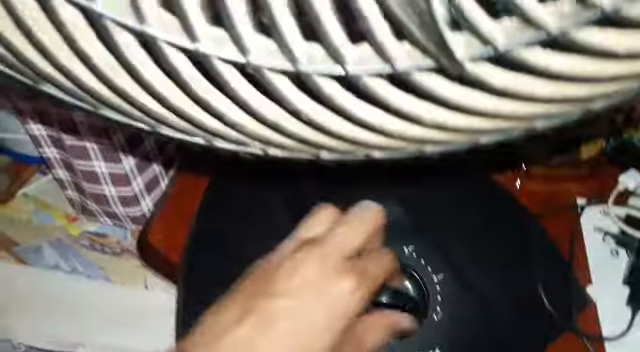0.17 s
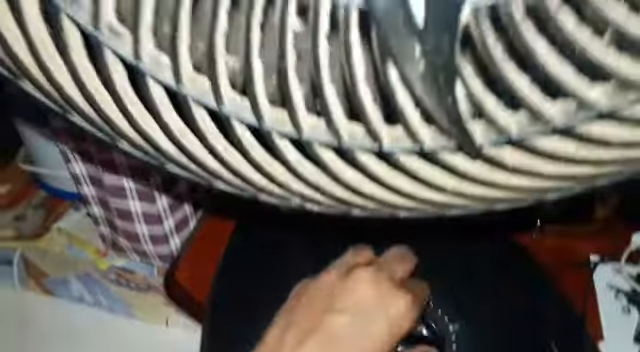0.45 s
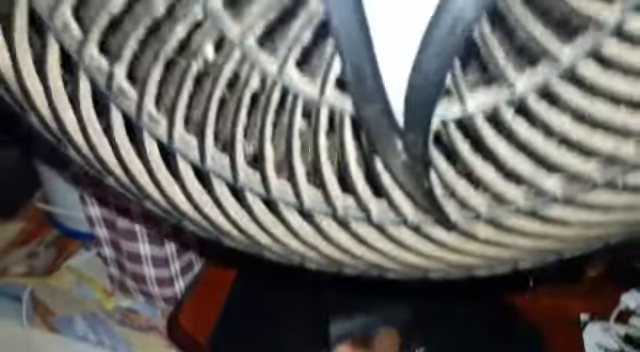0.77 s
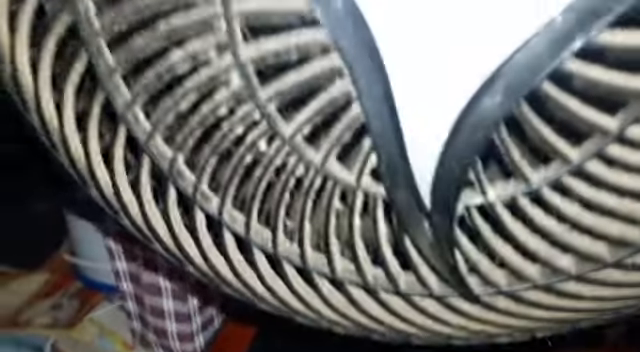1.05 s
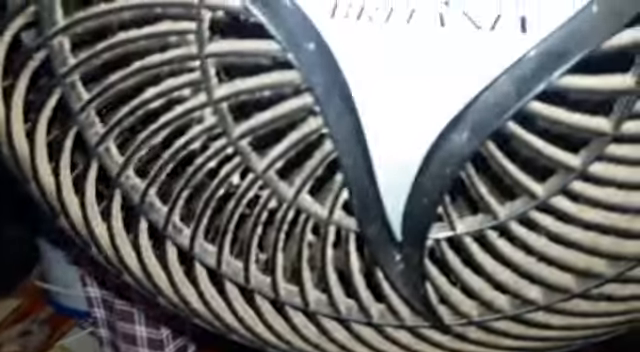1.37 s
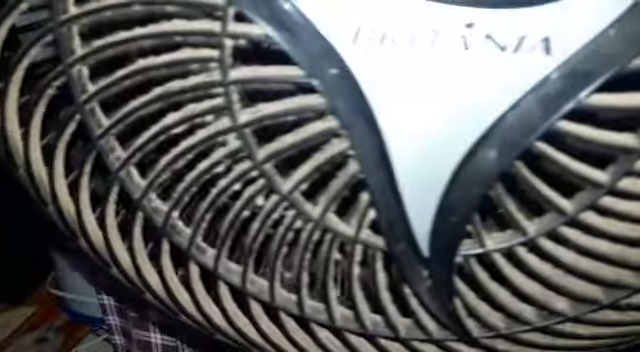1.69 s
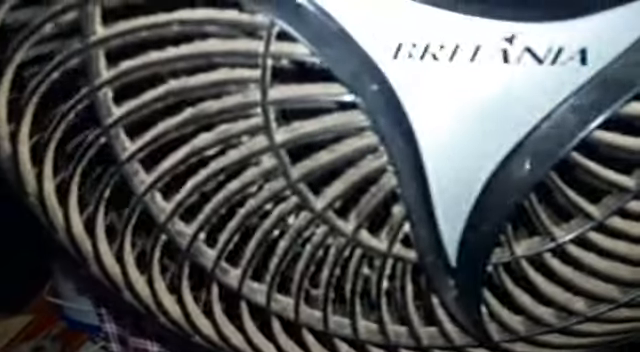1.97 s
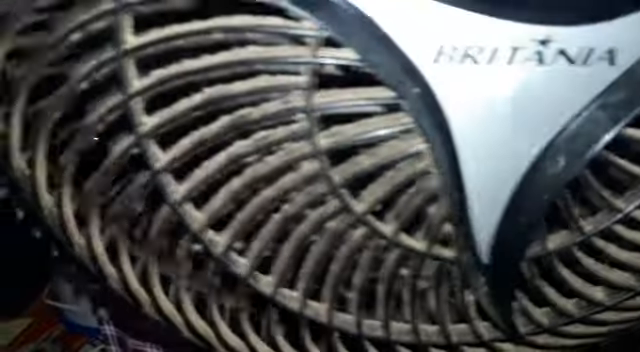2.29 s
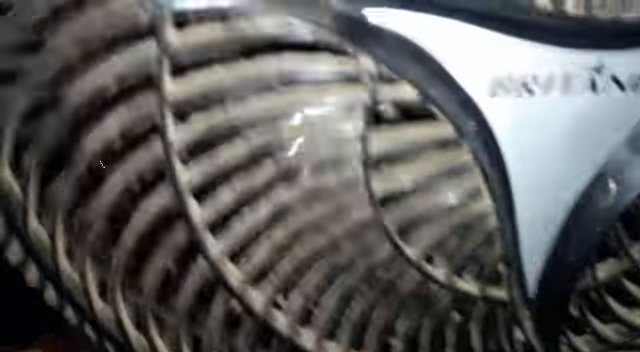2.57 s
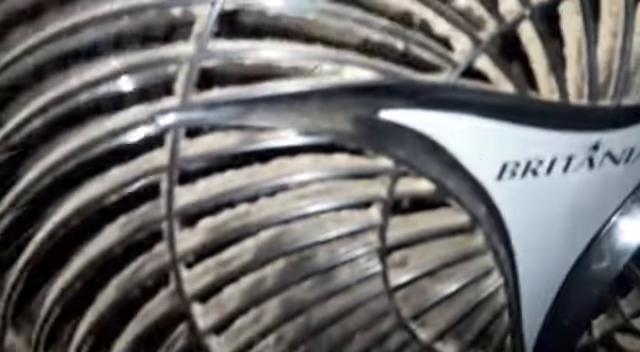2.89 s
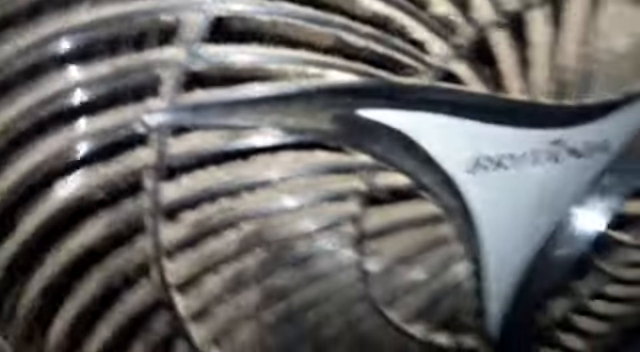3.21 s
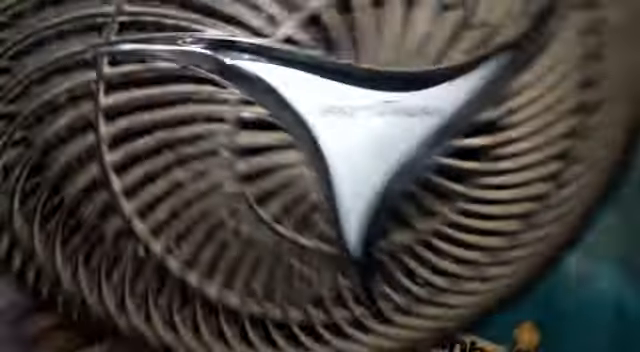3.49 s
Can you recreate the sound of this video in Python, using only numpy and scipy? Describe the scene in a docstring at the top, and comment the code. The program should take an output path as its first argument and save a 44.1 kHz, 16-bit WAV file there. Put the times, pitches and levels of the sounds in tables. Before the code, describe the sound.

A desk fan blows onto a handheld phone indoors, with loud low wind buffeting from start to end, rough, fluttering and slightly overloaded. Irregular dull air slaps punctuate it, strong near 0.6, 1.9, 2.3 and 2.85 seconds. Much quieter blade hiss rises from about 2.3, peaks around 3.1, then recedes. Small, mostly buried plastic ticks occur near 0.3, 0.65, 2.0 and 3.2. Dry, close sound.

```python
"""Desk fan blowing onto a phone

The phone is held in the stream and drifts closer to the guard and away again.
Eddies convected past the port make a low buffeting, higher in pitch in faster air, with strong single slaps.
The blades hiss through the guard as shaped noise; a few small plastic ticks are decaying resonances."""
import sys
import numpy as np
from scipy import signal
from scipy.fft import rfft, irfft, next_fast_len
from scipy.io import wavfile
from scipy.ndimage import uniform_filter1d, map_coordinates

SR = 44100
rng = np.random.default_rng(int(sys.argv[2]) if len(sys.argv) > 2 else 0)


def generate_wav(sig):
    """Save sig (samples, or channels by samples) to the path in sys.argv[1] as 16-bit PCM at SR."""
    pcm = np.round(np.clip(np.atleast_2d(sig).T, -1, 1) * 32767).astype(np.int16)
    wavfile.write(sys.argv[1], SR, pcm)


def volts(x):
    """Linear amplitude factor 10**(x/20) for a level x in dB, scalar or array-like."""
    e = np.asarray(x, float) / 20
    return 10 ** e


N = 160965  # length in samples


def table(rows):
    """Transposition: the columns of a table as arrays."""
    return np.array(rows, float).T


def unit(x):
    """Normalisation of a signal to rms 1."""
    return x / np.sqrt(np.mean(x ** 2))


def shaped(db_of_hz, size):
    """Spectral shaping: white noise weighted in the frequency domain by a level in dB."""
    hz = np.maximum(np.arange(size // 2 + 1) * SR / size, 1)
    return irfft(rfft(rng.standard_normal(size)) * volts(db_of_hz(hz)), size)


def points(rows):
    """Spectral envelope interpolated along a logarithmic frequency axis."""
    corner_hz, corner_db = table(rows)
    return lambda hz: np.interp(np.log(hz), np.log(corner_hz), corner_db)


def walk(rate_hz):
    """Band-limited random fluctuation: a spline through rate_hz normal deviates a second."""
    knots = rng.standard_normal(400)
    return map_coordinates(knots, [np.arange(N) / SR * rate_hz], order=3, mode="mirror")


def resonance_db(hz, centre_hz, width_hz):
    """Resonance curve: 0 dB at the centre, -3 dB at the edges of its width."""
    return -10 * np.log10(1 + (2 * (hz - centre_hz) / width_hz) ** 4)


def hiss(t):
    """Broadband blade noise: octave bands swell together and flicker independently."""
    # blade noise and its treble tilt: start_s, level_db, tilt_db
    blade_noise = [(0, -40, 0.5), (.5, -39.5, 0), (.9, -40, 0.5), (1.2, -37.5, 0.5), (1.55, -36.5, 1.5),
                   (1.8, -38, 1.5), (2.0, -37.5, 2), (2.15, -38.5, 2), (2.3, -36, 2.5), (2.45, -33.5, 1),
                   (2.65, -34, 2), (2.85, -34, 2.3), (3.1, -32.5, 2), (3.25, -34, 1.5), (3.4, -36.5, 1),
                   (3.65, -42, 1)]
    # spectral density of the noise, relative: frequency_hz, density_db
    colour_rows = [(100, -34), (500, -4), (1050, 1.5), (1230, -2.5), (1370, -0.5), (1650, -5.5),
                   (2100, -6.5), (2700, -13.5), (3300, -20.5), (3900, -25.5), (5000, -31), (6300, -28.5),
                   (7400, -21.5), (8000, -30), (8700, -28), (10200, -37.5), (11800, -38.5), (12400, -42.5),
                   (13200, -49.5), (16000, -62.5)]
    # reach of the tilt: octave_above_1_khz, gain_db_per_db_of_tilt
    tilt_reach = [(0, 0), (1, 1.16), (2, 2.5), (3, 3), (4, 4.5)]
    # narrow band, relative to the other noise at its loudest:
    # centre_hz, width_hz, level_db, growth_db_per_db_of_hiss
    narrow_band = (1381, 158, -10, .8)
    swell_db, flicker_db = 0.5, 0.84
    swell_rate_hz, flicker_rate_hz = 12, 21.89

    start_s, level_db, tilt_db = table(blade_noise)
    level = np.interp(t, start_s, level_db)
    tilt = np.interp(t, start_s, tilt_db)
    swell = swell_db * walk(swell_rate_hz)
    colour = points(colour_rows)
    size = next_fast_len(N)
    broad = np.zeros(N)
    for octave in np.arange(-3, 5):
        def band_db(hz):
            """Power-complementary crossfade between neighbouring octaves."""
            distance = np.clip(np.log2(hz / 1000) - octave, -1, 1)
            share = np.cos(np.pi / 2 * distance) + 1e-9
            return colour(hz) + 20 * np.log10(share)

        band = shaped(band_db, size)[:N]
        reach = np.interp(octave, *table(tilt_reach))
        broad += band * volts(reach * tilt + flicker_db * walk(flicker_rate_hz))

    # the narrow band stands out as the hiss grows
    centre_hz, width_hz, ring_db, growth = narrow_band
    ring = shaped(lambda hz: resonance_db(hz, centre_hz, width_hz), size)[:N]
    ring_gain_db = ring_db + growth * (level - level_db.max()) + 2 * walk(7)
    mixed = unit(broad) + unit(ring) * volts(ring_gain_db)
    return unit(mixed) * volts(level + swell)


def resonant_noise(modes):
    """Modal superposition: noise whose power spectrum is a sum of resonances."""
    def modes_db(hz):
        """Incoherent addition of the modal powers."""
        return 10 * np.log10(sum(volts(2 * (db + resonance_db(hz, f, width))) for f, width, db in modes))

    return unit(shaped(modes_db, next_fast_len(N))[:N])


def ticks(t):
    """Damped resonance: each plastic tick is exponentially decaying noise through modes."""
    # ticks, levels of the noise before its envelope, body and top relative to the click:
    # start_s, click_db, t60_s, body_db, body_pitch_hz, top_db
    tick_rows = [(0.3065, -48.5, 0.04, 18.5, 1190, -6), (0.6494, -29.5, 0.019, 7.5, 1470, -17),
                 (2.0162, -38, 0.029, 2.5, 2370, -14.5), (3.1825, -39.5, 0.027, 15.5, 2100, 2.5),
                 (3.194, -42.5, 0.022, 14, 2470, -3), (3.1994, -49, 0.018, 20, 2050, -8)]
    # modes of the click: centre_hz, width_hz, relative_level_db
    click_modes = [(3800, 1400, -9), (6040, 740, -7), (7440, 530, 5.5)]
    # modes of the top: centre_hz, width_hz, relative_level_db
    top_modes = [(9800, 1500, 8), (11800, 1200, -3)]
    body_width_hz, body_t60_ratio = 910, 2.03
    click_rise_s, body_rise_s = 0.001, 0.003

    def decay(age, t60_s, rise_s):
        """Linear rise times an exponential fall of 60 dB in t60_s."""
        return np.minimum(age / rise_s, 1) * np.exp(-np.log(1000) * age / t60_s)

    click = resonant_noise(click_modes)
    top = resonant_noise(top_modes)
    out = np.zeros(N)
    for start_s, click_db, t60_s, body_db, body_hz, top_db in tick_rows:
        age = np.maximum(t - start_s, 0)
        body = resonant_noise([(body_hz, body_width_hz, 0)])
        strike = (click + volts(top_db) * top) * decay(age, t60_s, click_rise_s)
        after_ring = volts(body_db) * body * decay(age, body_t60_ratio * t60_s, body_rise_s)
        out += volts(click_db) * (strike + after_ring)
    return out


def slaps(t):
    """Transient pressure pulses: each strong eddy is a Gaussian-windowed swing of about one cycle."""
    # single strong eddies: start_s, envelope_peak_db, pitch_hz
    strong_eddies = [(0.005, -7, 339), (0.072, -11, 373), (0.276, -12, 350), (0.535, -9.5, 387),
                     (0.619, -3, 333), (0.657, -11.5, 372), (0.867, -10, 405), (0.96, -9, 400),
                     (1.054, -12, 390), (1.126, -12.5, 413), (1.249, -11, 400), (1.506, -14.5, 386),
                     (1.631, -13, 436), (1.703, -15, 385), (1.852, -7.5, 480), (1.892, -4.5, 420),
                     (1.963, -8, 410), (2.011, -6, 370), (2.037, -17, 506), (2.126, -9.5, 440),
                     (2.258, -26, 377), (2.326, -3.5, 392), (2.446, -7, 455), (2.565, -11.5, 450),
                     (2.815, -10, 450), (2.852, -5.5, 380), (2.975, -20, 466), (3.615, -11, 400)]
    spread_cycles, rise_cycles = 0.43, 1.115

    out = np.zeros(N)
    turns = rng.random(len(strong_eddies))
    for (start_s, peak_db, pitch_hz), turn in zip(strong_eddies, turns):
        cycles = (t - start_s) * pitch_hz - rise_cycles
        envelope = np.exp(-0.5 * (cycles / spread_cycles) ** 2)
        # random phase within a quarter cycle either way
        swing = np.cos(2 * np.pi * (cycles + 0.5 * turn - 0.25))
        out += volts(peak_db) * envelope * swing
    return out


def buffeting(t):
    """Frozen turbulence: a fixed row of eddies swept past the port, higher and louder in faster air."""
    # air stream at the port, speed relative to the mean: start_s, level_db, speed_db
    stream = [(0, -18.5, -1), (.25, -14.5, 0.5), (.45, -14.5, -2), (.65, -13.5, 0), (.9, -13, -1),
              (1.15, -12, 0), (1.35, -13.5, -0.5), (1.55, -11, 0), (1.75, -11, 0), (1.95, -11.5, 2),
              (2.15, -11.5, 2), (2.4, -14, 1), (2.6, -11.5, 0), (2.85, -11.5, 0.5), (3.1, -11.5, 1),
              (3.3, -14, 1.5), (3.45, -12.5, -1), (3.65, -15.5, 0.5)]
    # gain of the deep rumble, which swells apart: start_s, gain_db
    deep_swell = [(0, 3.5), (.35, -0.5), (.7, 4.5), (1.0, -2), (1.3, -1), (1.6, -6), (1.9, 1.5), (2.3, -1),
                  (2.7, -0.5), (3.1, 1), (3.4, 0), (3.65, -1.5)]
    # eddy pressure density at mean air speed, relative: frequency_hz, density_db
    eddy_spectrum = [(20, -3.5), (100, 0.5), (200, -1.5), (300, -5.5), (400, -10), (520, -19), (700, -30.5),
                     (1000, -46.5), (2000, -83)]
    deep_hz = 150
    slow_db, slow_rate_hz = 0.25, 8
    quick_db, quick_rate_hz, settle_s, knee = 1.9, 70, 0.07, 1.3
    louder_per_speed = 0.12  # dB of level per dB of gust
    flutter_db, flutter_rate_hz = 2.2, 60
    even_over_s, evenness = 0.045, 0.5
    even_samples = int(even_over_s * SR)

    # air speed: quick swings about their local mean flatten out beyond the knee
    start_s, level_db, speed_db = table(stream)
    quick = walk(quick_rate_hz)
    quick = quick - uniform_filter1d(quick, size=int(settle_s * SR))
    gust_db = slow_db * walk(slow_rate_hz) + quick_db * np.tanh(quick / knee) * knee
    place = np.cumsum(volts(np.interp(t, start_s, speed_db) + gust_db))

    # the fan sheds eddies steadily: their local strength is partly evened out
    row = unit(shaped(points(eddy_spectrum), size=next_fast_len(2 * N)))
    power = uniform_filter1d(row ** 2, size=even_samples)
    power = uniform_filter1d(power, size=even_samples)
    row = row / power ** (evenness / 2)

    # the pressure flutters in all sizes of eddy at once
    flutter = walk(flutter_rate_hz)
    flutter = flutter - uniform_filter1d(flutter, size=even_samples)
    swept = map_coordinates(row, [place], order=3, mode="wrap")
    air = swept * volts(louder_per_speed * gust_db + flutter_db * flutter)

    low_pass = signal.butter(2, deep_hz, fs=SR, output="sos")
    deep = signal.sosfiltfilt(low_pass, air)
    air = air + deep * (volts(np.interp(t, *table(deep_swell))) - 1)
    return unit(air) * volts(np.interp(t, start_s, level_db))


def scene():
    """Linear superposition of the hiss, the ticks and the wind on the port."""
    t = np.arange(N) / SR
    return (hiss(t) + ticks(t) + slaps(t) + buffeting(t))[None]


def top_cut(x):
    """Nothing passes above the cut-off."""
    return signal.sosfilt(signal.butter(12, 14500, fs=SR, output="sos"), x)


def record(dry):
    """Transduction: port and phone high-pass the pressure, the capsule swings further one way."""
    port_cut_hz, port_q, phone_cut_hz = 113, 0.85, 45
    lopsided, ceiling = 0.18, 1.1

    w = 2 * np.pi * port_cut_hz
    b, a = signal.bilinear([1, 0, 0], [1, w / port_q, w ** 2], SR)
    x = signal.lfilter(b, a, dry)
    x = x + lopsided * x ** 2
    x = signal.sosfilt(signal.butter(2, phone_cut_hz, "high", fs=SR, output="sos"), x)
    # peaks are rounded towards the ceiling
    mix = ceiling * np.tanh(x / ceiling)
    return top_cut(mix)


dry = scene()
out = record(dry)
generate_wav(out)
```